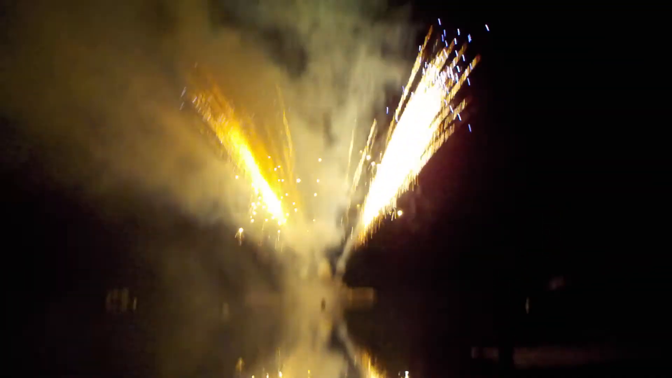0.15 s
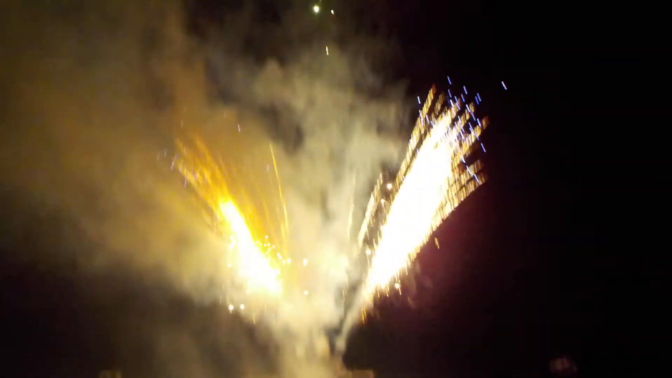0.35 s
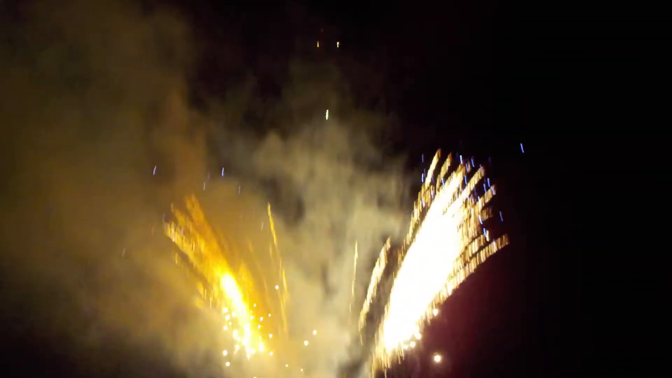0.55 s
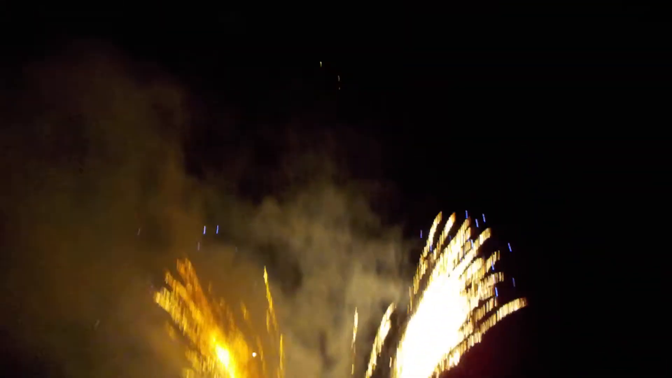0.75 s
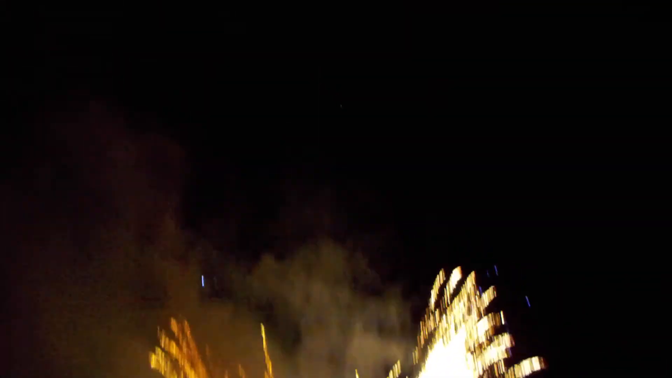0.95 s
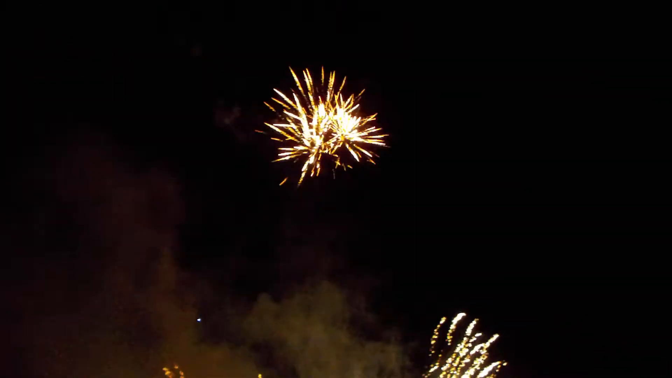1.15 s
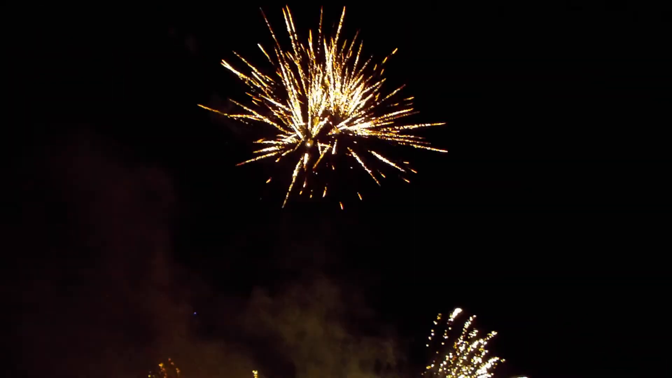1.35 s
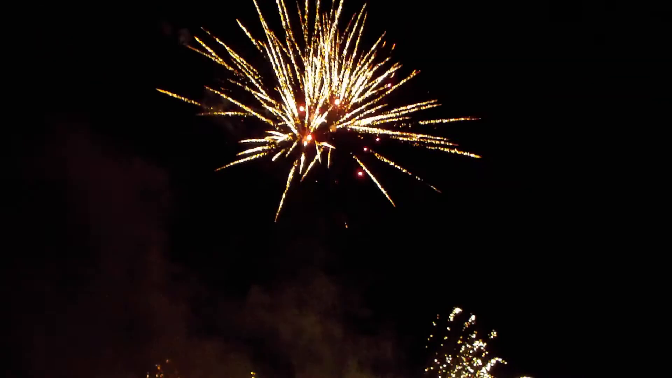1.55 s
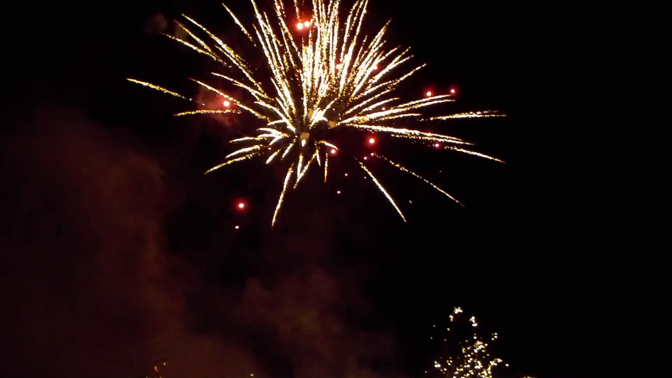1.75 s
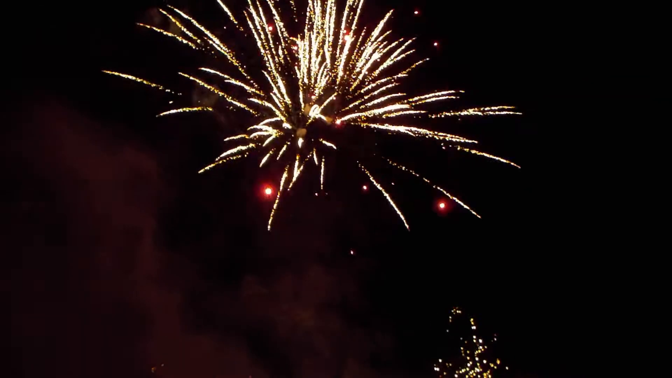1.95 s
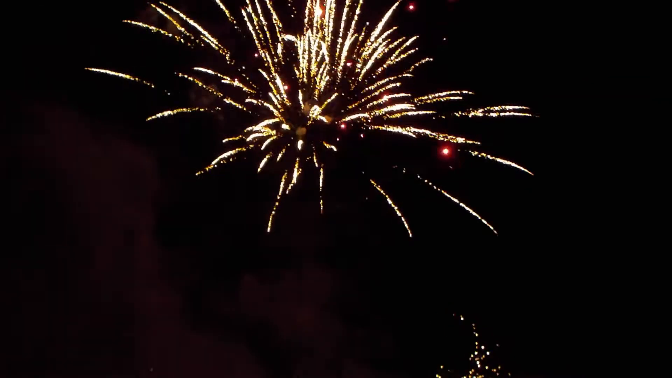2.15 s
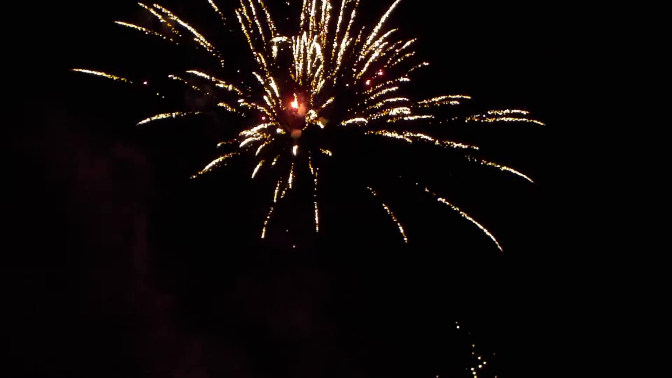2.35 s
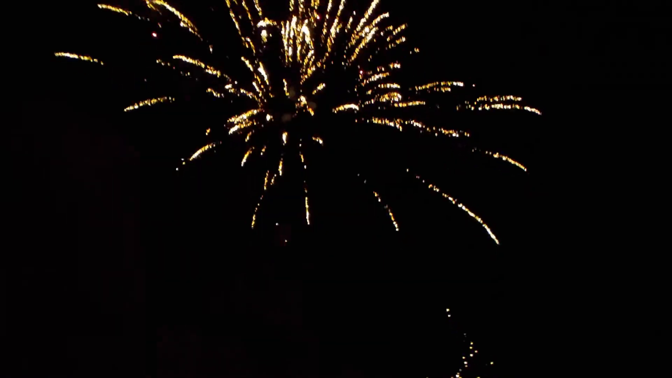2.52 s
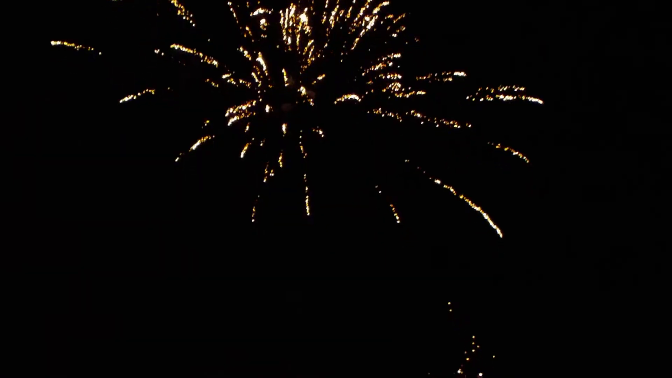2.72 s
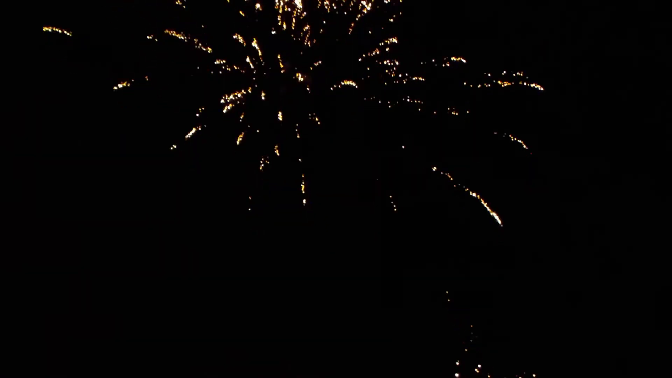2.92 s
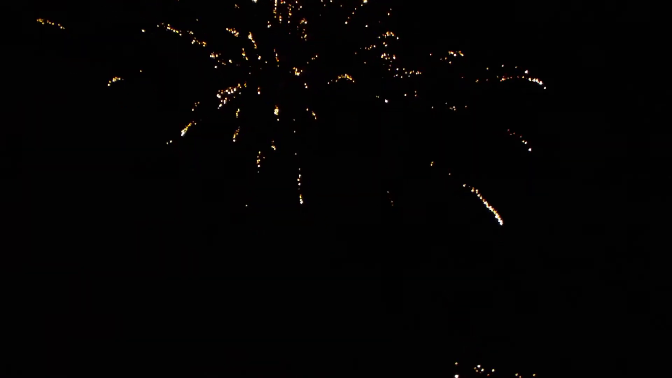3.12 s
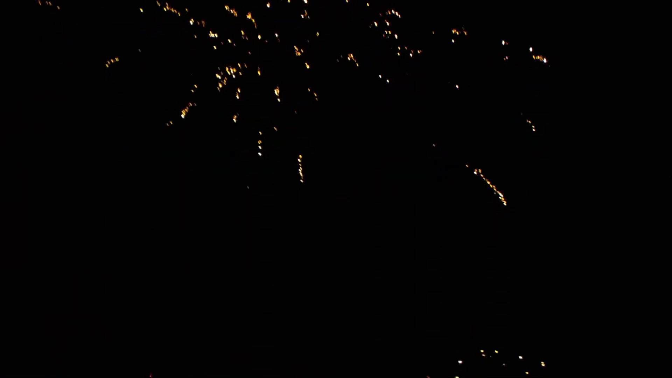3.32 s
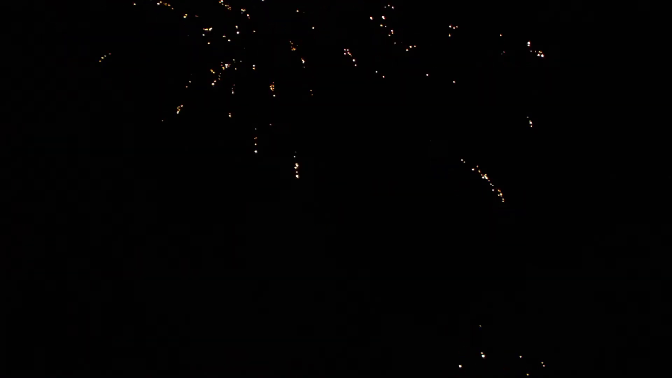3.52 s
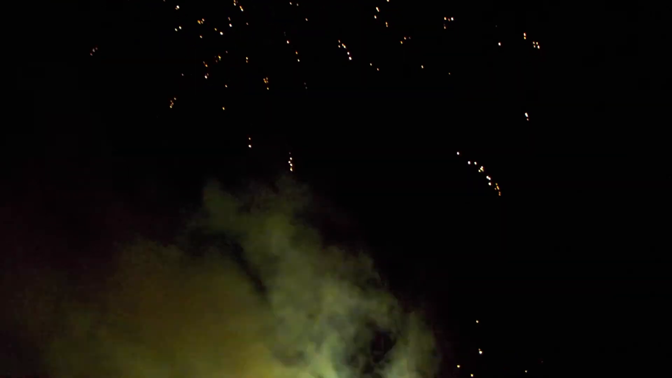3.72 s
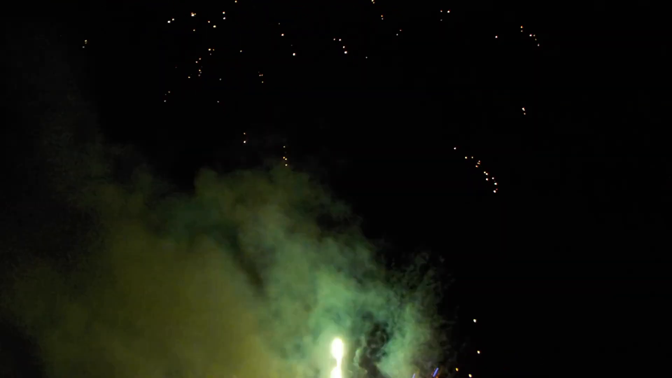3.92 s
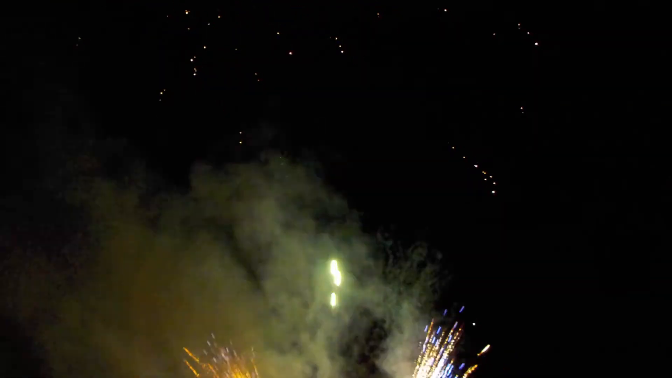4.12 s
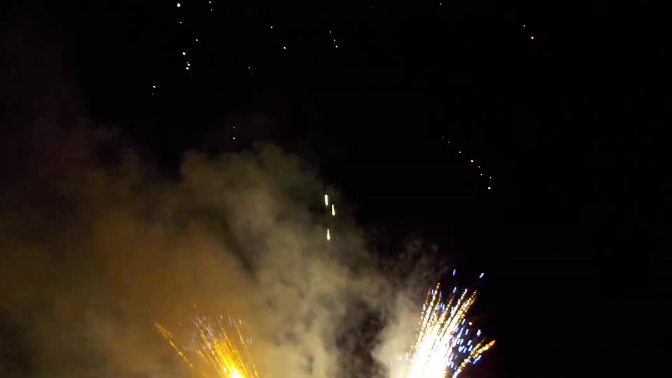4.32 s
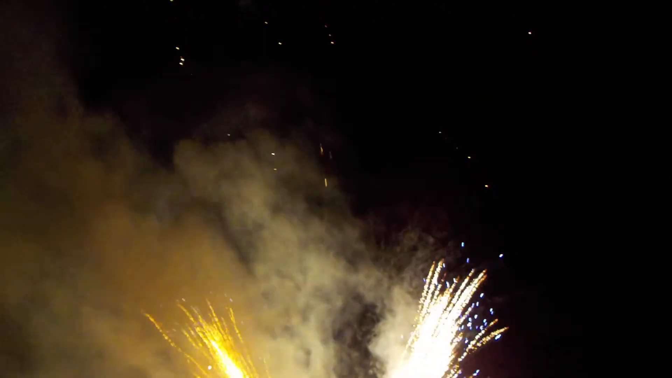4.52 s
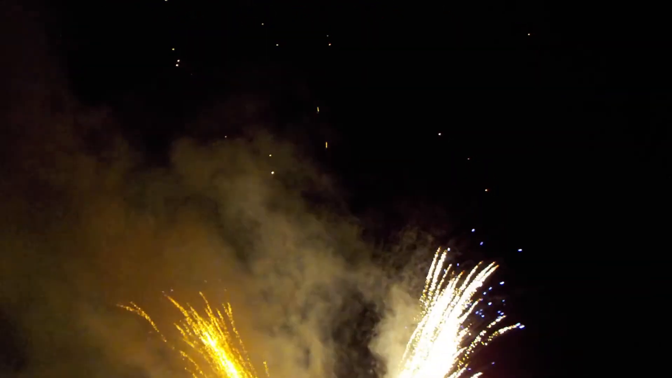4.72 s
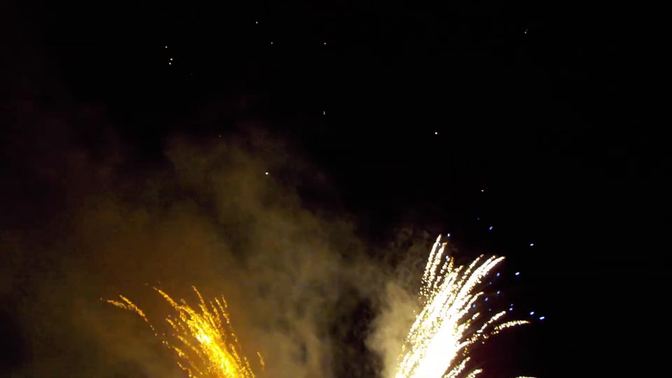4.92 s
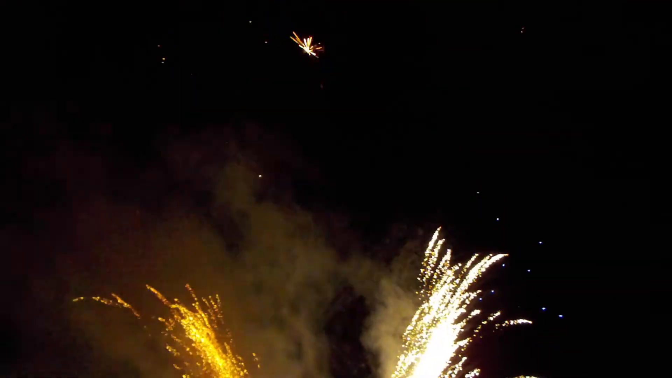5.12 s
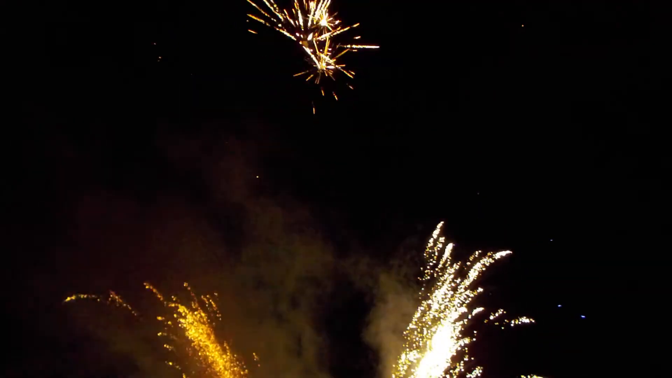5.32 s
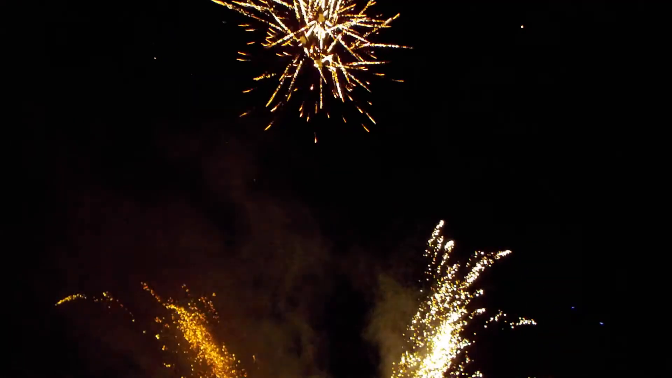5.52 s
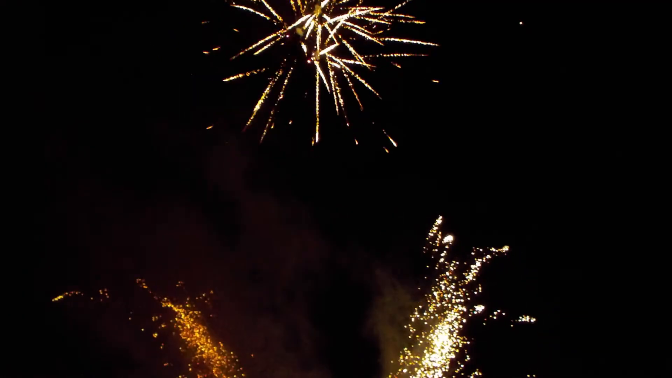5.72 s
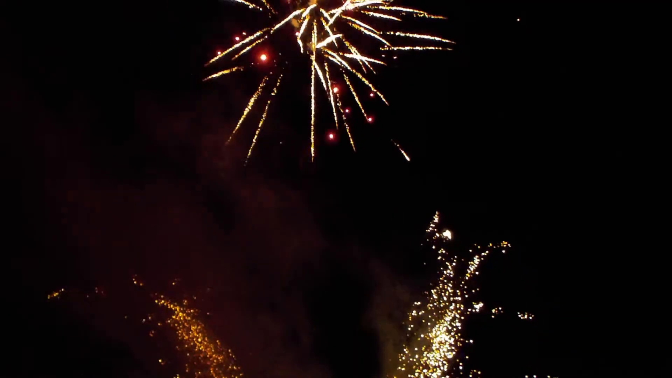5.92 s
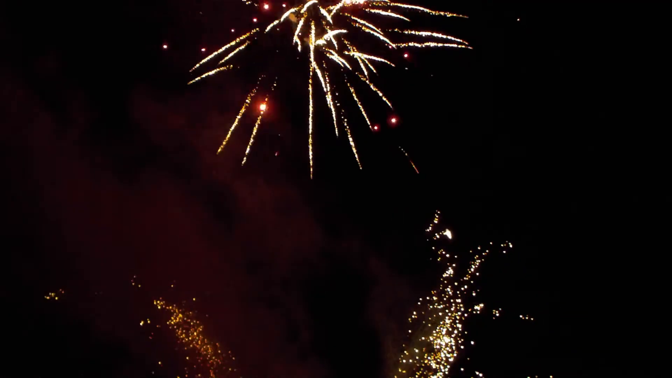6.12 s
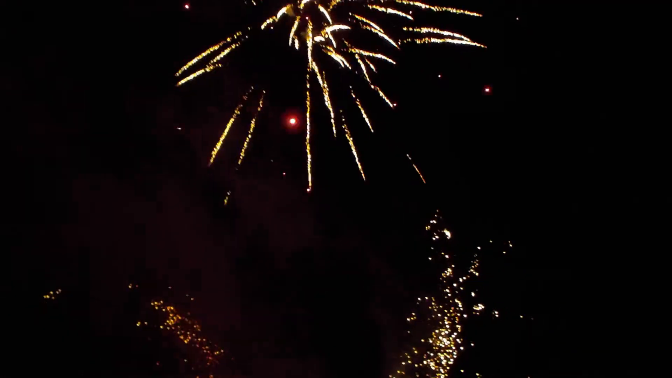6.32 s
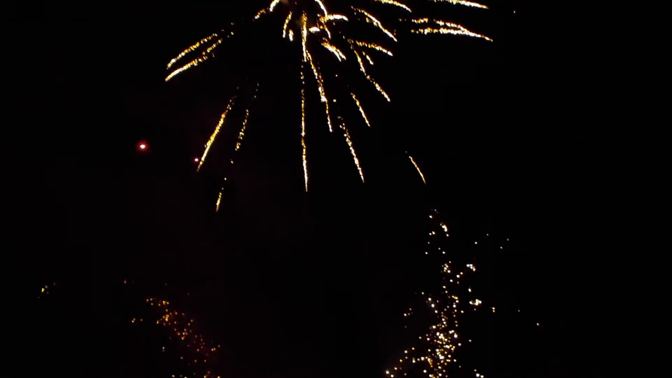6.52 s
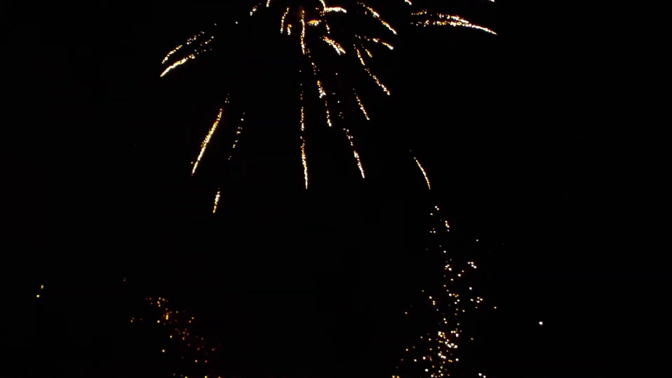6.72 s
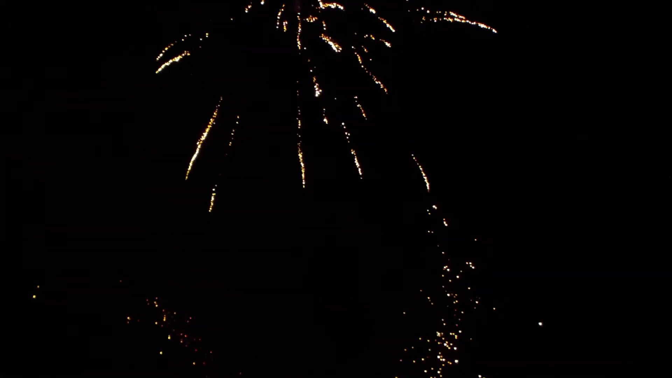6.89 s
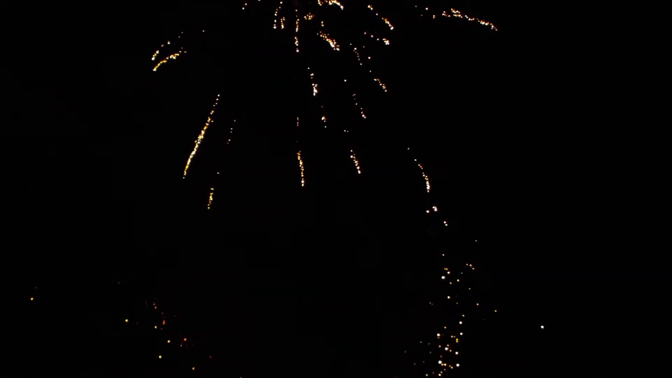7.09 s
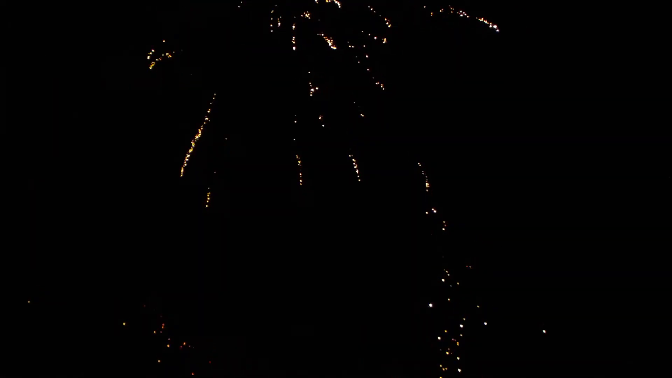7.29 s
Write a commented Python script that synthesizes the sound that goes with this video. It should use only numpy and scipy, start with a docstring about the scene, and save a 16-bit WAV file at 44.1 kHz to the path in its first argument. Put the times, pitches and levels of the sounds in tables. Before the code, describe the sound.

Outdoor fireworks crackle thickly, burst overhead in tight clusters of loud cracks, roll off the banks, pause, thump and do it all again.

```python
"""Firework cake over a lake

Two volleys at night, heard from the shore: each is a fan of crackling stars (dense random pops) with bunches
standing out, then shells burst (N-waves with ground echo). Lift charges thump before the second fan;
the lake returns swells and rolls of filtered pops and noise. Limiter ducks on bangs; steep peaks spit.
"""
import sys
import numpy as np
from scipy import signal
from scipy.fft import rfft, irfft
from scipy.io import wavfile
from scipy.ndimage import uniform_filter1d, minimum_filter1d

SR = 44100
rng = np.random.default_rng(int(sys.argv[2]) if len(sys.argv) > 2 else 0)


def transcribe(u):
    """Save the signal u as a 16-bit wav file named by the first command-line argument.

    u: samples, shape (n,) or (channels, n), limited to [-1, 1]; the rate is SR.
    q: integer samples, one column per channel.
    """
    v = np.clip(np.atleast_2d(u).T, -1, 1)
    q = np.round(v * 32767).astype(np.int16)
    wavfile.write(sys.argv[1], SR, q)


N = 324135
TIME = np.arange(N) / SR

# star crackle, body spectrum: f/Hz, relative level/dB
FAN_BODY_SPECTRUM = [(90, -42), (190, -22.5), (300, -19), (450, -9.5), (600, 0.5), (760, 5), (1000, 1.5),
                     (1250, 6), (1900, 3.5), (2750, -5.5), (3500, -17.5)]
# star crackle, hiss spectrum: f/Hz, relative level/dB
FAN_HISS_SPECTRUM = [(2200, -7.5), (3200, -6), (3650, -1), (4600, -11), (5300, 3.5), (6200, -2.5),
                     (7100, -3.5), (7800, -15.5), (8600, -33), (12000, -28)]
# top-octave snap and overload spectrum: f/Hz, relative level/dB
SPIT_SPECTRUM = [(30, -7), (90, -32), (2000, -36), (7500, -27), (8800, 5.5), (11000, 15), (12300, 12.5)]
# reflected rumble spectrum: f/Hz, relative level/dB
ROLL_RUMBLE_SPECTRUM = [(50, -61), (85, -26), (130, -21), (180, -9), (270, 4.5), (400, 7), (600, -2.5),
                        (1000, -21.5)]
# reflected body spectrum: f/Hz, relative level/dB
ROLL_BODY_SPECTRUM = [(250, -44.5), (450, -6.5), (620, 0.5), (1200, 1), (1900, -5.5), (2750, -18),
                      (3600, -27)]
# stereo width: f/Hz, side re mid before trim/dB
SIDE_SPECTRUM = [(100, -13.5), (600, -20.5), (1500, -17), (2700, -12.5), (3600, -11), (5200, -6.5),
                 (16000, -0.5)]
# lift charges in the mortar tubes: t/s, relative peak/dB, wave length/ms, treble/dB, ground echo/dB
LIFT_CHARGES = [(3.8327, 8, 1.07, -6.5, -32), (3.8439, 4, 1, -11, -12), (3.8509, 5.5, 0.86, -9.5, -11),
                (3.862, -6, 0.56, -11, -22)]
# shells bursting overhead: t/s, relative peak/dB, wave length/ms, treble/dB, ground echo/dB
SHELL_BURSTS = [(1.3357, -11, 0.44, -2, -22.5), (1.34, 13.5, 1.55, -2.5, -14), (1.3684, 13, 1.62, -5, -8.5),
                (1.3955, 4.5, 1.2, -2, -11), (5.4245, 11.5, 1.32, -7.5, -7), (5.5957, 15, 1.64, -2, -0.5),
                (5.623, 8.5, 0.94, -4, -12)]


def undb(db):
    """Amplitude ratio from dB."""
    return 10 ** (np.asarray(db) / 20)


def rms(x):
    """Root mean square, kept above zero."""
    return np.sqrt(np.mean(x ** 2)) + 1e-12


def shape(x, gain_db, size=4096):
    """Causal minimum-phase filter, by folded cepstrum, from gain in dB as a function of Hz."""
    f_hz = np.maximum(np.fft.rfftfreq(size, 1 / SR), 1)
    cepstrum = irfft(np.log(undb(gain_db(f_hz))))
    cepstrum[1:size // 2] *= 2
    cepstrum[size // 2 + 1:] = 0
    response = irfft(np.exp(rfft(cepstrum)))[:size // 2]
    return signal.oaconvolve(x, response)[:len(x)]


def colour(x, points):
    """Filter by (Hz, dB) points, with skirts of 12 dB/octave below (3 octaves at most) and 18 above."""
    hz, db = np.transpose(points)

    def gain_db(f):
        low_skirt = 12 * np.minimum(np.log2(f / hz[0]), 0).clip(-3)
        high_skirt = -18 * np.maximum(np.log2(f / hz[-1]), 0)
        return np.interp(np.log(f), np.log(hz), db) + low_skirt + high_skirt

    return shape(x, gain_db)


def lowpass(x, hz, order=2):
    """Butterworth low-pass."""
    return signal.sosfilt(signal.butter(order, hz, fs=SR, output="sos"), x)


def highpass(x, hz, order):
    """Butterworth high-pass."""
    return signal.sosfilt(signal.butter(order, hz, "high", fs=SR, output="sos"), x)


def add(track, at_s, sound):
    """Mix a sound into a track in place."""
    start = max(int(at_s * SR), 0)
    track[start:start + len(sound)] += sound[:max(N - start, 0)]


def walk(rate_hz):
    """Smooth random wandering at unit RMS: interpolated noise points."""
    steps = np.interp(TIME * rate_hz, np.arange(N), rng.standard_normal(N))
    return steps / rms(steps)


def pops(rate_hz, spread_db):
    """Random impulses of uneven size and either sign, levelled to a short-term power near 1."""
    hits = rng.random(N) < rate_hz / SR
    sizes = undb(spread_db * rng.standard_normal(N))
    train = hits * sizes * rng.choice([-1, 1], N)
    return train / np.sqrt(uniform_filter1d(train ** 2, size=3000) + 1e-6)


def stereo(train, spectrum):
    """Colour a train at equal power; each sample has a random bearing, widest in the treble."""
    side = colour(train * rng.standard_normal(N), SIDE_SPECTRUM)
    norm = np.linalg.norm(colour(signal.unit_impulse(2048), spectrum))
    return np.array([colour(train + side, spectrum), colour(train - side, spectrum)]) / norm


def fan_levels(catch_s=.11, fizz_s=.3, fizz_db=-12, fizz_rise_db_per_s=41, thin_db_per_s=32, dull_db_per_s=3.5):
    """Fan body and hiss: a fizz, a quick swell, a hold, then steady thinning; hiss fades with age."""
    # fans: t of catching/s, hold/s, body level/dB, hiss level/dB
    fan_table = [(0.169, .72, -24, -26), (4.265, 0.72, -23, -26)]
    total = np.zeros((2, N))
    for at_s, hold_s, body_db, hiss_db in fan_table:
        age_s = TIME - at_s
        fizz = fizz_rise_db_per_s * np.minimum(age_s, 0)
        swell = fizz_db * (1 - np.clip(age_s / catch_s, 0, 1)) + fizz
        db = swell - thin_db_per_s * np.maximum(age_s - catch_s - hold_s, 0)
        dulling = dull_db_per_s * np.maximum(age_s, 0)
        total += (age_s > -fizz_s) * undb([body_db + db, hiss_db + db - dulling])
    return total


def fans(body_db=1, hiss_db=1, snap_db=-16, full_db=-26, rate_hz=2800, spread_db=3.0,
         clump_db=1.5, clump_hz=240, bunch_db=1.15, bunch_hz=110, snap_hz=55):
    """Many tiny stars pop in clumps; the louder the fan, the denser and more even the pops."""
    body, hiss = fan_levels()
    fullness = np.clip(body / undb(full_db), .4, 1.5)
    bunches_db = bunch_db * walk(bunch_hz) * (1 / fullness - .5)
    train = pops(rate_hz * fullness, spread_db)
    train = train * undb(clump_db * walk(clump_hz) / np.sqrt(fullness) + bunches_db)
    # a few stars snap into the top octave where the fan is thick
    snaps = pops(snap_hz, spread_db=2.5) * hiss * np.minimum(fullness, 1) ** 2
    return (stereo(train * body * undb(body_db), FAN_BODY_SPECTRUM)
            + stereo(train * hiss * undb(hiss_db), FAN_HISS_SPECTRUM)
            + stereo(snaps * undb(snap_db), SPIT_SPECTRUM))


def cluster(crackle, at_s, ms, tail_db, tail_s):
    """Packed pops at a set energy for their length, with a brief scatter after them."""
    t, length_s = TIME[:SR // 16], max(ms, 1) / 1000
    envelope = np.exp(-(t / length_s) ** 4) + undb(tail_db) * np.exp(-t / tail_s)
    burst = crackle[int(at_s * SR):][:len(t)] * envelope
    return burst / np.linalg.norm(burst) * np.sqrt(length_s * SR)


def spurts(body_db=-8, hiss_db=-12, snap_db=-23, rate_hz=6000, spread_db=3):
    """Bunches of stars stand out of the fan, in its fizz, its hold or as it thins, each led by a thin snap."""
    # bunches of stars: t/s, relative level/dB, nominal length/ms
    spurt_table = [(1.052, -27, 17), (1.07, 3, 3.4), (1.143, -14.5, 10), (1.172, -19, 30), (1.21, -13, 3.3),
                   (1.239, -6.5, 2.9), (1.254, -11, 3.2), (1.266, -8, 12), (1.311, -16.5, 5.1),
                   (4.125, -25.5, 2), (4.182, -23, 2.3), (4.248, -23, 7.8), (4.384, -25, 4.7),
                   (4.4746, -10, 5.1), (5.125, -8, 6), (5.197, -15.5, 7.9), (5.22, -12, 5.6),
                   (5.238, -8, 8.1), (5.264, -13.5, 13), (5.306, -16.5, 10), (5.327, -7, 1.1),
                   (5.344, -15.5, 19), (5.385, -6.5, 5.4), (5.405, -16, 13.4)]
    train, snaps = np.zeros((2, N))
    crackle = pops(rate_hz, spread_db)
    for at_s, db, ms in spurt_table:
        add(train, at_s, cluster(crackle, at_s, ms, tail_db=-22.0, tail_s=.019) * undb(db))
        snap = cluster(crackle, at_s, ms / 2, tail_db=-32, tail_s=.003)
        add(snaps, at_s, snap * undb(db + snap_db))
    return (stereo(train * undb(body_db), FAN_BODY_SPECTRUM)
            + stereo(train * undb(hiss_db), FAN_HISS_SPECTRUM) + stereo(snaps, SPIT_SPECTRUM))


def cracks(rate_hz=9000, spread_db=3, ms=3.07, snap_ms=.59):
    """Short bright cracks, most from single stars: a top-octave snap with body and hiss that scatter a little."""
    # cracks, the one at 3.935 s the lift echo's bright edge: t/s, body level/dB, hiss level/dB, snap level/dB
    crack_table = [(1.549, -22, -21, -26.5), (1.6601, -9.5, -17.5, -21), (2.158, -21.5, -22.5, -69),
                   (3.092, -53, -43.5, -78), (3.935, -30, -23.5, -70), (5.5229, -11.5, -18.5, -31),
                   (5.877, -15, -17, -49.5), (5.903, -18, -21, -19.5), (6.103, -18, -23, -35),
                   (6.1686, -20, -25.5, -33), (6.2446, -19, -24, -22.5)]
    body, hiss, snaps = np.zeros((3, N))
    crackle = pops(rate_hz, spread_db)
    for at_s, body_db, hiss_db, snap_db in crack_table:
        burst = cluster(crackle, at_s, ms, tail_db=-9, tail_s=.007)
        add(body, at_s, burst * undb(body_db))
        add(hiss, at_s, burst * undb(hiss_db))
        snap = cluster(crackle, at_s, snap_ms, tail_db=-50, tail_s=.004)
        add(snaps, at_s, snap * undb(snap_db))
    return stereo(body, FAN_BODY_SPECTRUM) + stereo(hiss, FAN_HISS_SPECTRUM) + stereo(snaps, SPIT_SPECTRUM)


def reports(gain_db=1, echo_s=.00527, dull_hz=1900, scatter_db=-32, scatter_s=.011, slack=1.08, rounding=.019):
    """Shock front, pressure wave falling through zero, dull ground echo and scatter from the shore."""
    # blast colour: f/Hz, relative level/dB
    blast_spectrum = [(30, -44), (80, -34), (150, -3.5), (260, 2.5), (450, 5.5), (750, 14.5), (1200, 16),
                      (2000, 11.5), (4500, 15.5), (7000, 10), (9000, 2), (12300, 2.5)]
    out, t = np.zeros(N), TIME[:SR // 8]
    for at_s, db, ms, treble_db, echo_db in LIFT_CHARGES + SHELL_BURSTS:
        age = t * 1000 / ms
        rounded_end = (1 - np.tanh((age - 1) / rounding)) / 2
        n_wave = (1 - slack * 2 * age) * rounded_end
        scatter = rng.standard_normal(len(t)) * np.exp(-t / scatter_s) * undb(scatter_db)
        scattered = signal.fftconvolve(lowpass(n_wave, dull_hz), scatter)[:len(t)]
        blast = colour(n_wave + scattered, blast_spectrum)
        blast = colour(blast, [(20, 0), (1500, .015), (4000, treble_db - .5), (20000, treble_db + 22.0)])
        blast = blast / np.abs(blast).max() * undb(db + gain_db)
        add(out, at_s, blast)
        add(out, at_s + echo_s, lowpass(blast, dull_hz) * undb(echo_db))
    return out


def ports(x, lag_s=.0002, side_db=-3, low_hz=125):
    """Two microphone ports: a lagged, coloured side signal sets them apart; deep bass is lost."""
    x = highpass(x, low_hz, order=3)
    lagged = np.interp(TIME - lag_s, TIME, x)
    side = colour(lagged, SIDE_SPECTRUM) * undb(side_db)
    return np.array([x + side, x - side])


def slaps(gain_db=-6):
    """Each report returns from the shore or banks as dull swells of noise, smeared by the trees."""
    # echo paths of the lifts: delay/s, relative level/dB, smear/ms, rumble re body/dB
    near_shore = [(.079, -28, 6.2, -24), (.094, -23, 6.7, -18)]
    # echo paths of the shells: delay/s, relative level/dB, smear/ms, rumble re body/dB
    far_banks = [(.16, -43.5, 17, -6), (.345, -31.5, 13.6, -15.5), (.97, -53, 12, -6.5),
                 (1.16, -51.5, 16, -14.5), (1.325, -52, 26, -9), (1.62, -55, 6.9, -18)]
    body, rumble = np.zeros((2, N))
    t = TIME[:SR // 8]
    for shots, paths in (LIFT_CHARGES, near_shore), (SHELL_BURSTS, far_banks):
        for at_s, db, *_ in shots:
            for delay_s, path_db, smear_ms, rumble_db in paths:
                age = t * 1000 / smear_ms
                swell = age * np.exp(1 - age)
                echo = rng.standard_normal(len(t)) * swell * undb(db + path_db + gain_db)
                add(body, at_s + delay_s, echo)
                add(rumble, at_s + delay_s, echo * undb(rumble_db))
    return stereo(body, ROLL_BODY_SPECTRUM) + stereo(rumble, ROLL_RUMBLE_SPECTRUM)


def roll_levels(rise_s=.037):
    """Rumble, body and hiss of each swell: rise, hold, fast fall and slow tail, over a steady floor."""
    # rolls round the lake, and a faint murmur that swells before the lift charges:
    # t/s, hold/s, rumble level/dB, body level/dB, hiss level/dB
    roll_table = [(-.1, 0.15, -54.5, -37, -40.5), (1.342, 0.37, -35, -26.5, -35.5),
                  (3.69, 0.31, -64, -51, -69), (3.833, 0.13, -43.5, -33.5, -41.5),
                  (5.42, 0.47, -32.5, -26.5, -35)]
    # decay of rumble, body, hiss: share of hold, fall/(dB/s), tail level/dB, tail fall/(dB/s)
    decay_table = [(0.58, 36, -24.5, 8.5), (1, 33, -17.5, 9), (1, 39.5, -13, 15)]
    # floor over the lake throughout: level/dB of rumble, body, hiss
    floor_db = [-64, -52, -81.5]
    power = np.outer(undb(floor_db) ** 2, np.ones(N))
    for at_s, hold_s, *levels_db in roll_table:
        rise = np.clip((TIME - at_s) / rise_s, 0, 1)
        for band, (share, fall, tail_db, tail_fall) in enumerate(decay_table):
            late_s = np.maximum(TIME - at_s - share * hold_s, 0)
            decay = undb(-fall * late_s) ** 2 + undb(tail_db - tail_fall * late_s) ** 2
            power[band] += (rise * undb(levels_db[band])) ** 2 * decay
    return np.sqrt(power)


def roll(rumble_db=2, body_db=2, hiss_db=-2.0, rate_hz=2400, spread_db=3,
         patchy_db=1.2, patchy_hz=60, surge_db=1.6, surge_hz=11):
    """Rolls off trees and banks, and a faint murmur: surging pops for rumble and body, noise for hiss."""
    # hiss of the rolls: f/Hz, relative level/dB
    hiss_spectrum = [(2200, -27.5), (3200, -0.5), (3700, 5), (4600, -6.5), (5300, 7.5), (7000, -1),
                     (7800, -15.5), (9000, -44.5)]
    rumble, body, hiss = roll_levels()
    surge = undb(surge_db * walk(surge_hz))
    echoes = pops(rate_hz, spread_db) * undb(patchy_db * walk(patchy_hz)) * surge
    thuds = pops(rate_hz / 2, spread_db) * surge
    diffuse = rng.standard_normal(N)
    return (stereo(thuds * rumble * undb(rumble_db), ROLL_RUMBLE_SPECTRUM)
            + stereo(echoes * body * undb(body_db), ROLL_BODY_SPECTRUM)
            + stereo(diffuse * hiss * undb(hiss_db), hiss_spectrum))


def boom(start_s=3.835, db=-41, decay_s=1.0, end_s=.24):
    """Low thud of the mortar tubes: decaying noise that ends about end_s after its start."""
    # low thud: f/Hz, relative level/dB
    boom_spectrum = [(50, -39), (80, -13), (108, 4.5), (135, -4), (190, 7), (290, 5), (450, -34)]
    age_s = np.maximum(TIME - start_s, 0)
    decay = (age_s > 0) * np.exp(-age_s / decay_s)
    ending = np.exp(-(age_s / end_s) ** 8)
    return stereo(rng.standard_normal(N) * decay * ending * undb(db), boom_spectrum)


def night_air(level_db=-78.0):
    """Steady coloured noise: faint rumble and hiss of the night air."""
    # air noise: f/Hz, relative level/dB
    air_spectrum = [(90, 8), (190, 9.5), (400, -5), (1500, 6.5), (6000, -4), (8200, -35), (9500, 6),
                    (11000, 17.5), (12300, -2)]
    return stereo(rng.standard_normal(N) * undb(level_db), air_spectrum)


def limiter(x, ceiling_db=-7.5, squeeze=.82, release_db_per_s=120):
    """Gain shared by both channels: drops at once at a loud peak, recovers at a steady dB rate."""
    peak_db = 20 * np.log10(np.abs(x).max(axis=0) + 1e-9)
    cut_db = np.maximum(peak_db - ceiling_db, 0) * squeeze
    recovered_db = release_db_per_s * TIME
    gain_db = recovered_db - np.maximum.accumulate(cut_db + recovered_db)
    held_db = minimum_filter1d(gain_db, size=45)  # about 1 ms
    return x * undb(uniform_filter1d(held_db, size=45))


def scene():
    """Both volleys and their echoes over the night air."""
    crackle = fans() + spurts() + cracks()
    return crackle + ports(reports()) + slaps() + roll() + boom() + night_air()


def record(dry, steep_hz=3000, overload_limit=.21, round_level=.75, bass_hz=85,
           mic_top_hz=11720, mic_fall_db_per_octave=118, top_hz=15000, balance_db=-.22):
    """Limiter, rounded peaks, top-octave spit from steep peaks, uneven housing response, band limit."""
    # microphone housing, hollows and a bump: f/Hz, Gaussian width/Hz, gain/dB
    housing_table = [(2397, 190, -22.5), (3015, 114, -14), (4550, 560, 4.5), (7955, 413, -18)]
    dry = limiter(dry)
    steep = highpass(dry, steep_hz, order=2)
    overload = steep - np.clip(steep, -overload_limit, overload_limit)

    def housing_db(f):
        uneven = sum(db * np.exp(-((f - hz) / width_hz) ** 2) for hz, width_hz, db in housing_table)
        return uneven - mic_fall_db_per_octave * np.log2(f / mic_top_hz).clip(0, .3)

    rounded = dry / (1 + (dry / round_level) ** 6) ** (1 / 6)
    rounded = highpass(rounded, bass_hz, order=3)
    wet = np.array([shape(sound - colour(over, SPIT_SPECTRUM), housing_db)
                    for sound, over in zip(rounded, overload)])
    wet = wet * undb(np.array([[balance_db], [-balance_db]]) / 2)
    return signal.sosfilt(signal.ellip(8, .2, 70, top_hz, fs=SR, output="sos"), wet)


dry = scene()
out = record(dry)
transcribe(out)
```